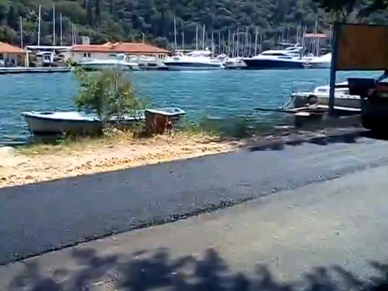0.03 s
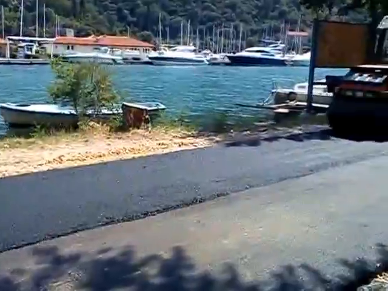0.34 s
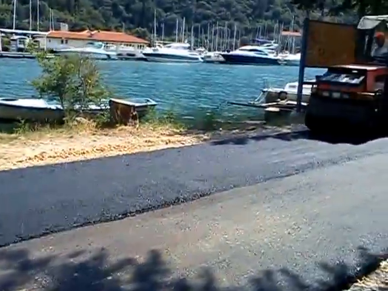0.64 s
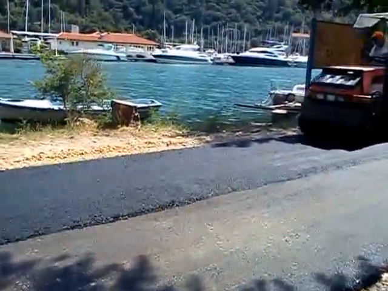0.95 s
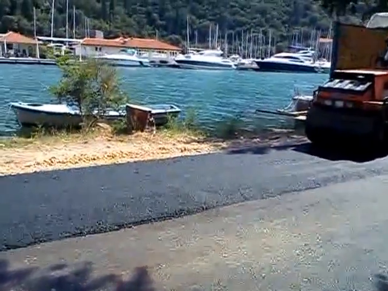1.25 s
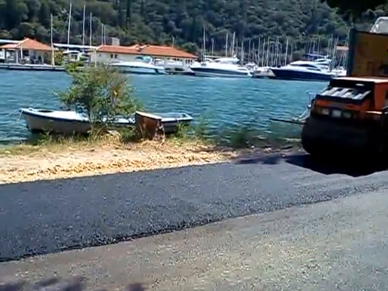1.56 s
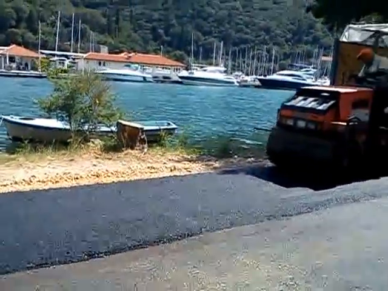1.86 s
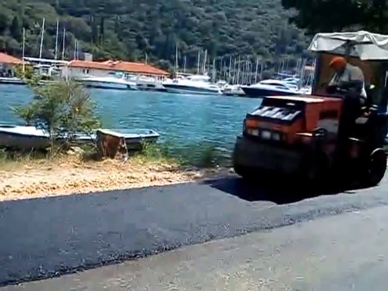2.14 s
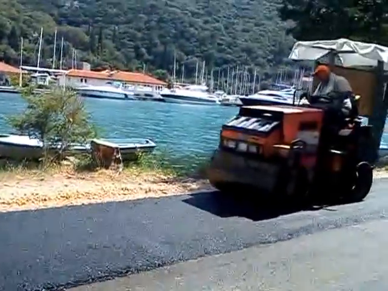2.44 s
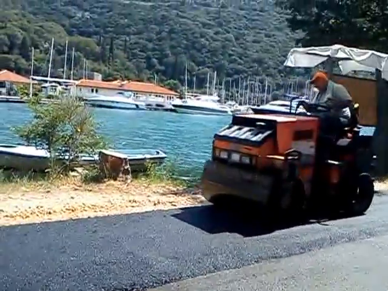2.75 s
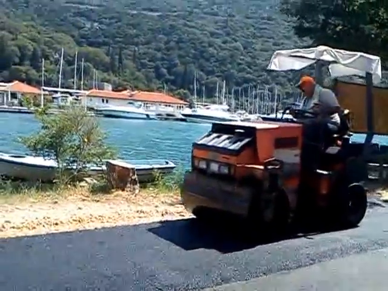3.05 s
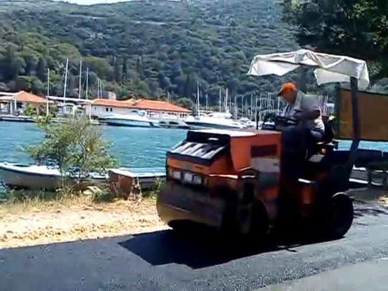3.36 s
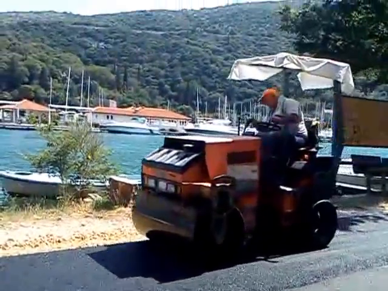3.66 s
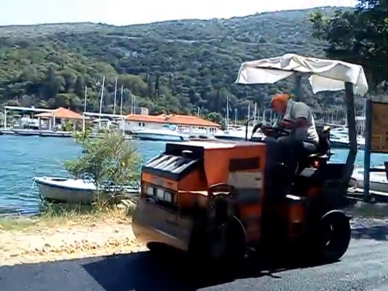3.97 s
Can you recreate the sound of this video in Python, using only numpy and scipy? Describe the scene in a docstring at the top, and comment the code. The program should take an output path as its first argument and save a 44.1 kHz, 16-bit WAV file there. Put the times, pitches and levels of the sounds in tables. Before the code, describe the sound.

A road roller works a few metres from the microphone in the open air, with a low diesel drone and a deep, shaking hum. The frame clanks once, gears whine briefly, and the rattling gradually eases.

```python
"""A small diesel road roller creeps past over fresh asphalt, a few metres away.
Its exhaust drones at multiples of the engine's speed, the engine clatters and its gears whine.
A spinning off-centre weight shakes the drum, which hums, beats against the drone and rattles the frame.
A short hiss opens the scene and a faint one runs throughout. Later the frame clanks once,
the drum scrapes briefly, and near the end the weight starts to slow down."""
import sys
import numpy as np
from scipy import signal
from scipy.fft import rfft, irfft
from scipy.io import wavfile
from scipy.ndimage import uniform_filter1d, minimum_filter1d

SR = 44100
rng = np.random.default_rng(int(sys.argv[2]) if len(sys.argv) > 2 else 0)


def bounce(signal):
    """Save signal as a 16-bit WAV file at the path given by the first command-line argument."""
    frames = np.transpose(np.atleast_2d(signal))
    limited = np.clip(frames, -1, 1)
    pcm = np.round(limited * 32767).astype(np.int16)
    wavfile.write(sys.argv[1], SR, pcm)


N = 176400
TIME = np.arange(N) / SR
CRANK_HZ = 25.79  # turns per second of the engine's shaft


def gain(db):
    """Turn decibels into a number to multiply by."""
    return 10 ** (np.asarray(db) / 20)


def curve(table, column=1):
    """Join a table's values with straight lines through time."""
    rows = np.array(table, float)
    return np.interp(TIME, rows[:, 0], rows[:, column])


def drift(rate_hz):
    """A smooth random wobble, about 1 in size."""
    hold = int(SR / rate_hz)
    steps = np.repeat(rng.standard_normal(400), hold)[:N]
    return 1.3 * uniform_filter1d(uniform_filter1d(steps, hold), hold)


def shape(sound, tone):
    """Make some frequencies stronger than others, then set the average strength to 1."""
    rows, hz = np.array(tone, float), np.fft.rfftfreq(N, 1 / SR) + 1
    db = np.interp(np.log(hz), np.log(rows[:, 0]), rows[:, 1], left=-90, right=-90)
    shaped = irfft(rfft(sound) * gain(db), N)
    return shaped / np.sqrt(np.mean(shaped ** 2))


def noise(tone):
    """Steady noise with the given tone."""
    return shape(rng.standard_normal(N), tone)


def knocks(turns, decay_turns, scatter_db, bed, repeat):
    """One burst a turn over a steady bed of noise; `repeat` is the share that is alike each turn."""
    turn, phase = np.floor(turns).astype(int), turns % 1
    strength = gain(scatter_db * rng.standard_normal(1024))[turn]
    turn_samples = int(N / (turns[-1] - turns[0]))
    pattern = rng.standard_normal(8192)[(phase * turn_samples).astype(int)]
    grain = np.sqrt(repeat) * pattern + np.sqrt(1 - repeat) * rng.standard_normal(N)
    return grain * (bed + uniform_filter1d(strength * np.exp(-phase / decay_turns), size=300))


# The strong exhaust notes. Each entry: a multiple of the shaft's speed.
STRONG_NOTES = (1, 3, 4, 5, 7, 8)
# Their loudness. Each row: time in seconds, then a level in dB for each note.
STRONG_LEVELS = [(0, -31, -33, -24, -28, -38, -32), (0.4, -30, -27, -19, -22, -31, -28),
                 (0.95, -29, -25, -21, -19, -38, -28), (1.4, -29, -23, -18, -22, -33, -28),
                 (1.8, -27, -23, -17, -25, -32, -29), (2.2, -26, -23, -17, -22, -36, -26),
                 (2.6, -25, -25, -16, -18, -28, -26), (3.3, -24, -29, -17, -16, -28, -31),
                 (4, -23, -28, -15, -18, -26, -28)]
# The weak notes. Each row: multiple of the shaft's speed, level in dB.
WEAK_NOTES = [(2, -31), (6, -33), (9, -33), (10, -40.5), (11, -36.5), (18, -38.5), (20, -44)]
# The rumble's loudness. Each row: time in seconds, level in dB.
RUMBLE_LEVELS = [(0, -31), (.2, -19), (.45, -27.5), (2, -26.5), (3.5, -26), (4, -18.5)]
# Its tone. Each row: frequency in Hz, relative level in dB.
RUMBLE_TONE = [(12, -30), (28, -20), (45, 5), (100, 1), (160, 1.5), (230, -2.5), (320, -16.5), (600, -20)]

def exhaust(crank, silencer_hz=121.5, width_hz=13):
    """Low notes leave the silencer, along with the rumble of swirling gas."""
    angle, hz = 2 * np.pi * crank, CRANK_HZ * np.array(STRONG_NOTES)
    # Notes above the silencer's own pitch swing against those below it.
    lag = np.arctan2(width_hz * hz, silencer_hz ** 2 - hz ** 2)
    drone = np.zeros(N)
    for i, multiple in enumerate(STRONG_NOTES):
        level = gain(curve(STRONG_LEVELS, column=i + 1) + 0.29 * drift(8.4))
        drone += level * np.sin(multiple * angle - lag[i])
    for multiple, db in WEAK_NOTES:
        drone += gain(db + 1.3 * drift(4.55)) * np.sin(multiple * angle + 2 * np.pi * rng.random())
    return np.sqrt(2) * drone + gain(curve(RUMBLE_LEVELS)) * noise(RUMBLE_TONE)


# The clatter's loudness. Each row: time in seconds, level in dB.
CLATTER_LEVELS = [(0, -28), (1.5, -31), (2.5, -27), (3.3, -25), (4, -26.5)]
# The tones of the clatter and ticks. Each row: frequency in Hz, relative level in dB.
CLATTER_TONE = [(160, -6), (280, -4.5), (415, -2.5), (522, 1), (772, -8.5), (866, -23), (1020, -7),
                (1160, -9.5), (1240, -9), (1670, -25.5), (1810, -8.5), (3110, -20.5), (5690, -30),
                (7040, -37.5), (14000, -59.5)]
TICK_TONE = [(2500, -30), (3800, -11), (4600, 0), (5800, 0), (7000, -13.5), (9000, -21), (11500, -30),
             (14000, -30)]

def engine_clatter(crank, tick_db=-48, rise_db_per_s=1.5):
    """Burning fuel knocks and the valves tick, once per turn of the shaft."""
    bangs = knocks(crank, decay_turns=0.58, scatter_db=1.0, bed=1.75, repeat=0.38)
    ticks = knocks(crank, decay_turns=0.39, scatter_db=1.2, bed=0.48, repeat=0.05)
    return (gain(curve(CLATTER_LEVELS)) * shape(bangs, CLATTER_TONE)
            + gain(tick_db + rise_db_per_s * TIME) * shape(ticks, TICK_TONE))


# The gear's loudness. Each row: time in seconds, level in dB.
GEAR_LEVELS = [(0, -50), (1, -44), (1.5, -36), (2, -27), (2.6, -34), (3.2, -44), (4, -50)]

def gear_whine(crank, teeth=54):
    """The teeth of a gear on the shaft meet fast enough to make a note."""
    level = gain(curve(GEAR_LEVELS) + 1.4 * drift(18))
    return level * np.sqrt(2) * np.sin(2 * np.pi * teeth * crank)


# The speed of the drum's weight. Each row: time in seconds, turns per second.
WEIGHT_SPEED = [(0, 72.1), (.9, 71.9), (1.3, 71.55), (2.1, 71.55), (2.6, 71.8), (3.47, 71.8), (3.68, 68.5),
                (4, 61.5)]
# The hum's higher notes. Each row: multiple of that speed, dB against the lowest note at mid-scene.
DRUM_OVERTONES = [(2, -16), (3, -25), (5, -23.5), (7, -31.5), (28, -24.5)]
# The loudness of the hum, bearing and rattle. Each row: time in seconds, level in dB.
HUM_LEVELS = [(0, -17.5), (.3, -16), (2, -15), (2.7, -17), (4, -18.5)]
BEARING_LEVELS = [(0, -44), (.6, -35.5), (1.1, -38), (1.6, -44), (2.7, -45), (3.25, -38), (3.6, -50),
                  (4, -60)]
RATTLE_LEVELS = [(0, -15.5), (.15, -17), (.55, -18.5), (1.1, -19.5), (1.65, -19), (2.05, -21), (2.5, -24),
                 (3.2, -25.5), (4, -28.5)]
# The rattle's tone. Each row: frequency in Hz, relative level in dB.
RATTLE_TONE = [(160, -31), (280, -9), (324, -4), (358, -3.5), (388, -7), (465, -6.5), (604, -10.5),
               (798, -3), (1130, -5.5), (1420, -2.5), (1930, -3.5), (3010, -13), (3780, -28), (5600, -27.5),
               (14000, -52.5)]

def drum(bearing_multiple=14, fade_db_per_s=2.5):
    """An off-centre weight shakes the drum: it hums, its bearing whines and the frame rattles."""
    turns = np.cumsum(curve(WEIGHT_SPEED)) / SR
    angle = 2 * np.pi * turns
    overtones = sum(gain(db + 2.5 * drift(7.53)) * np.sin(multiple * angle)
                    for multiple, db in DRUM_OVERTONES)
    overtones *= gain(-fade_db_per_s * (TIME - TIME.mean()))  # they fade as the drum turns away
    hum = gain(curve(HUM_LEVELS) + 0.34 * drift(8.6)) * (overtones - np.cos(angle))
    bearing = gain(curve(BEARING_LEVELS) + 3.0 * drift(14)) * np.sin(bearing_multiple * angle)
    shakes = knocks(turns, decay_turns=0.43, scatter_db=4.5, bed=3.5, repeat=0.043)
    rattle = gain(curve(RATTLE_LEVELS) + 0.68 * drift(14)) * shape(shakes, RATTLE_TONE)
    return np.sqrt(2) * (hum + bearing) + rattle


# The faint hiss's tone. Each row: frequency in Hz, relative level in dB.
FAINT_HISS_TONE = [(3500, -17), (7500, 8.5), (9500, -7), (11500, -5), (12100, 2), (12700, -1), (13900, 2)]

def faint_hiss(level_db=-49.5):
    """A smooth, high hiss that never stops."""
    return gain(level_db + 0.5 * drift(5.5)) * noise(FAINT_HISS_TONE)


# The short hiss's tone. Each row: frequency in Hz, relative level in dB.
SHORT_HISS_TONE = [(3500, -21), (4800, -8), (5600, 1.5), (6500, -4.5), (8000, -15), (10000, -26),
                   (14000, -22)]

def short_hiss(start_db=-30.5, fall_db_per_s=27, end_s=0.16, fade_s=0.03):
    """A high hiss flutters for a moment, then cuts off."""
    level = gain(start_db - fall_db_per_s * TIME + 2.8 * drift(58))
    fade = np.exp(-np.maximum(TIME - end_s, 0) / fade_s)
    return level * fade * noise(SHORT_HISS_TONE)


# The frame's ringing notes. Each row: pitch in Hz, width in Hz, relative level in dB.
FRAME_NOTES = [(835, 99, -1), (1320, 110, 6), (1500, 200, -11), (1720, 120, -1)]
# The clank's overall tone. Each row: frequency in Hz, relative level in dB.
CLANK_TONE = [(500, -15), (750, 0), (1900, 0), (3000, -20), (6000, -50)]

def clank(start_s=1.278, level_db=-13.5, rise_s=0.0064, decay_s=0.035):
    """One loose, dull knock rings the steel frame."""
    hz, age = np.fft.rfftfreq(N, 1 / SR), TIME - start_s
    frame = sum(gain(db) / (1 + 2j * (hz - pitch) / width) for pitch, width, db in FRAME_NOTES)
    ring = irfft(rfft(rng.standard_normal(N)) * frame, N)
    strike = np.clip(age / rise_s, 0, 1) * np.exp(-np.abs(age) / decay_s)
    return gain(level_db) * strike * shape(ring, CLANK_TONE)


# The scrape's tone. Each row: frequency in Hz, relative level in dB.
SCRAPE_TONE = [(3800, -18), (4400, -5), (4650, 2), (4900, -8), (8000, -13), (10500, -24), (12500, -15),
               (13900, -12)]

def scrape(peak_s=2.39, half_width_s=0.075, level_db=-40):
    """High noise swells once as the drum scrapes."""
    swell = np.exp(-((TIME - peak_s) / half_width_s) ** 2)
    return gain(level_db) * swell * noise(SCRAPE_TONE)


def scene():
    """Engine and drum together in the open air, in one channel."""
    crank = np.cumsum(CRANK_HZ * (1 + 0.0008 * drift(4))) / SR  # shaft turns so far
    engine = exhaust(crank) + engine_clatter(crank) + gear_whine(crank)
    return (engine + drum() + faint_hiss() + short_hiss() + clank() + scrape())[None]


def record(dry, ceiling=0.76, window_samples=441, top_hz=13950):
    """Turn down the loudest peaks and cut the highest treble."""
    volume = ceiling / np.maximum(np.abs(dry), ceiling)
    volume = uniform_filter1d(minimum_filter1d(volume, window_samples), window_samples)
    treble_cut = signal.ellip(10, 0.1, 90, top_hz, fs=SR, output="sos")
    return signal.sosfilt(treble_cut, dry * volume)


dry = scene()
out = record(dry)
bounce(out)
```